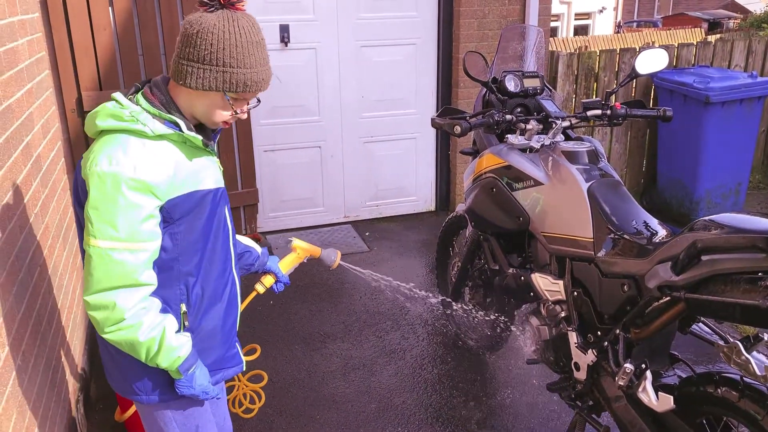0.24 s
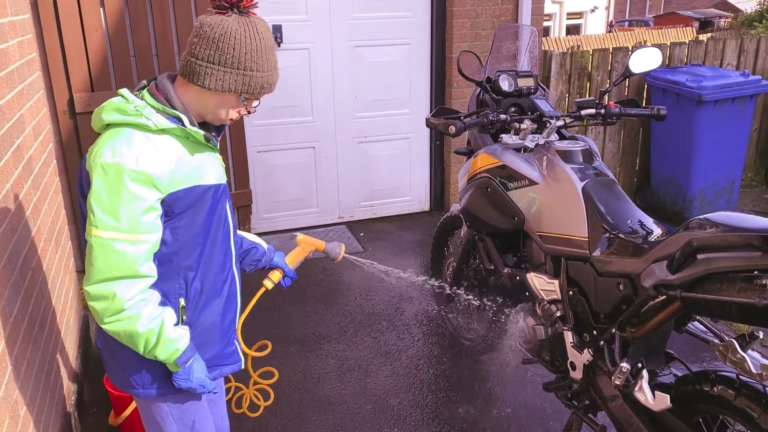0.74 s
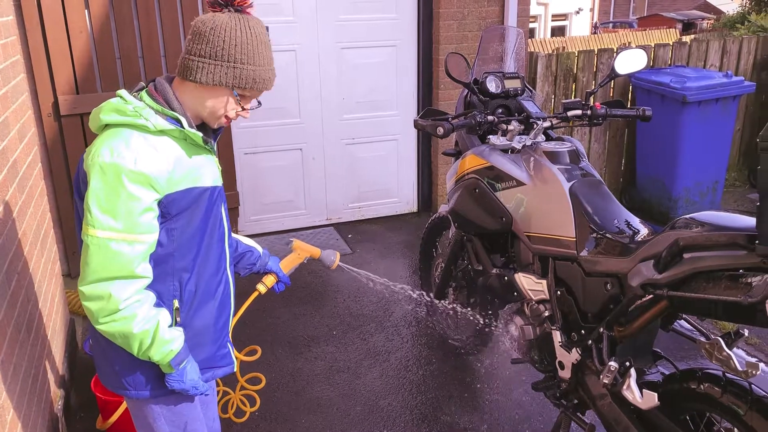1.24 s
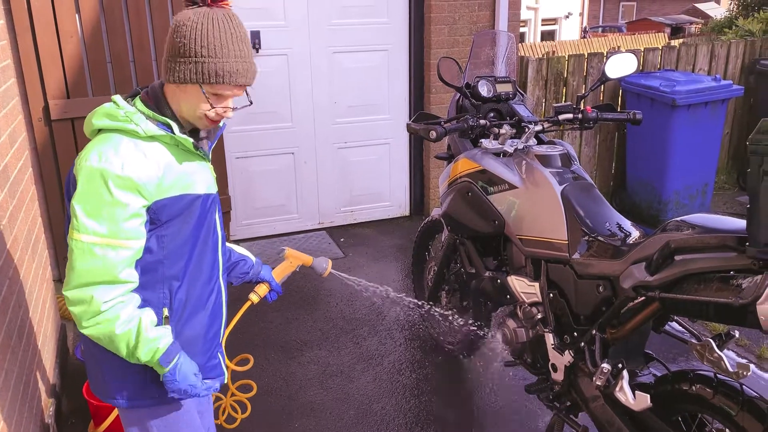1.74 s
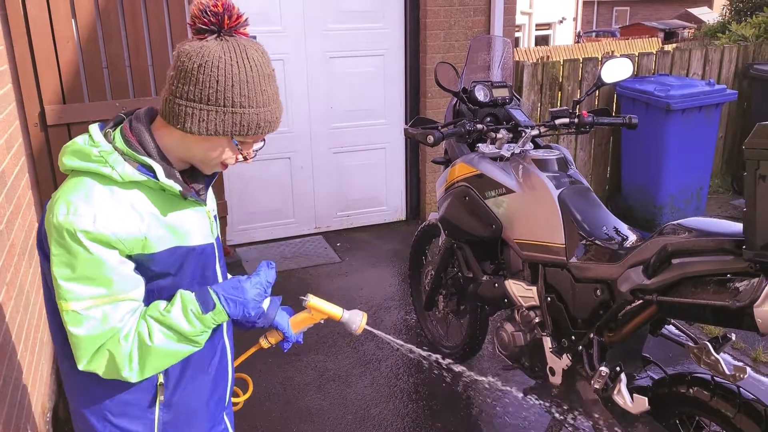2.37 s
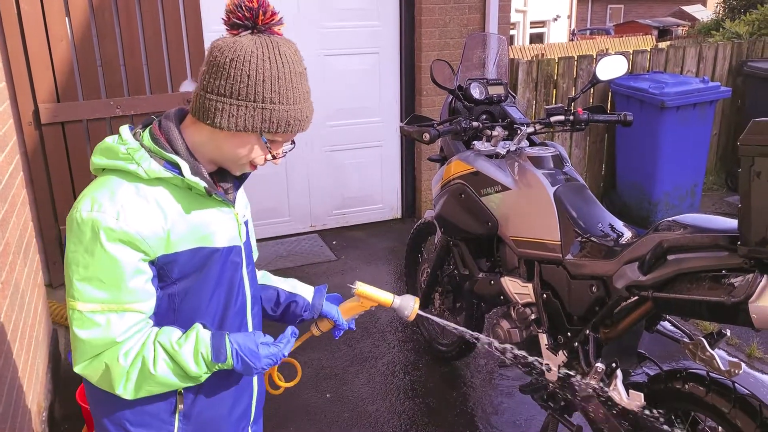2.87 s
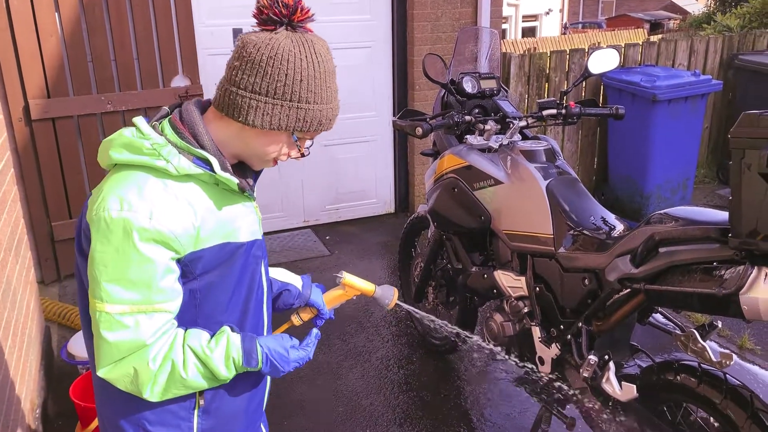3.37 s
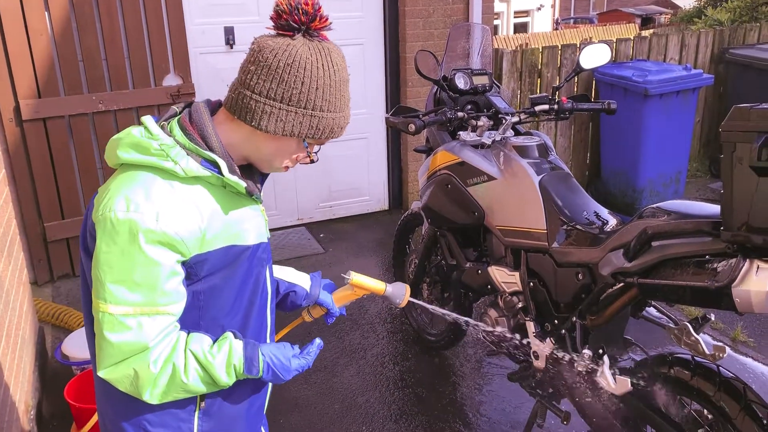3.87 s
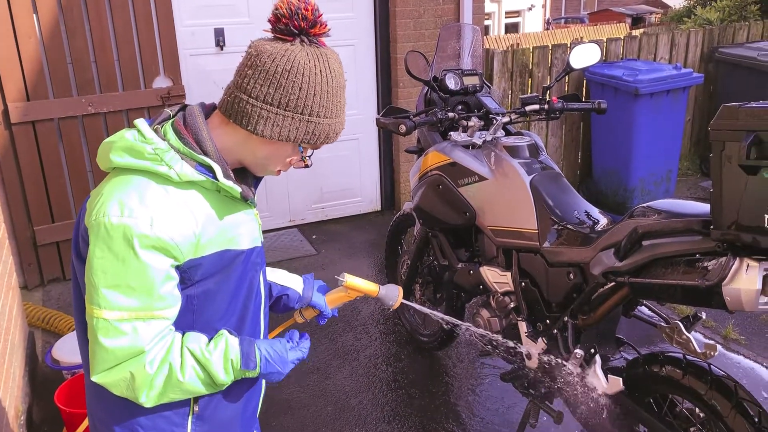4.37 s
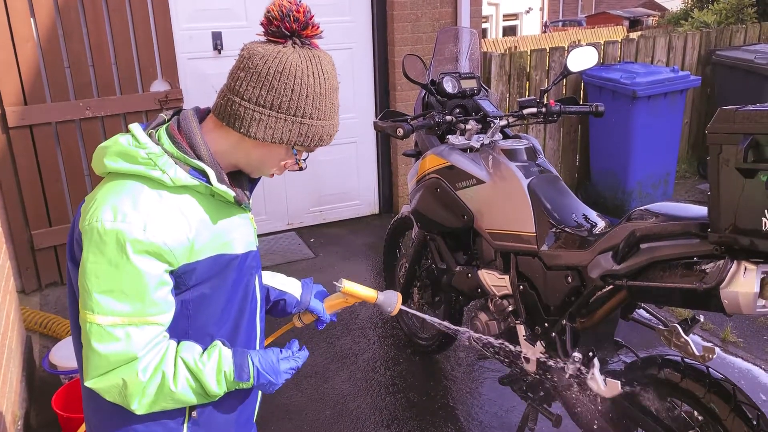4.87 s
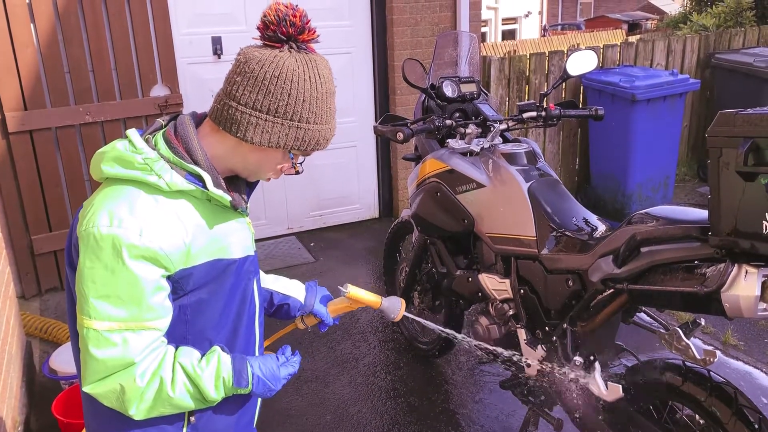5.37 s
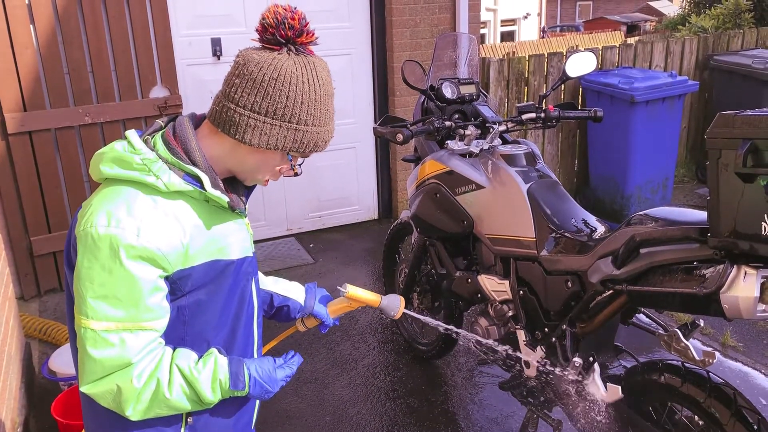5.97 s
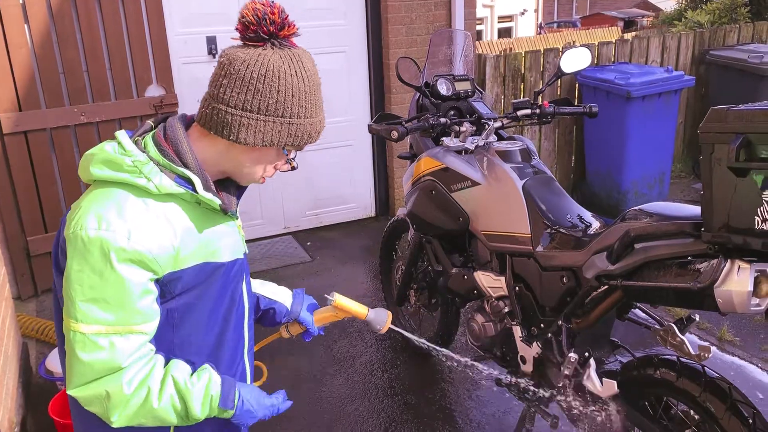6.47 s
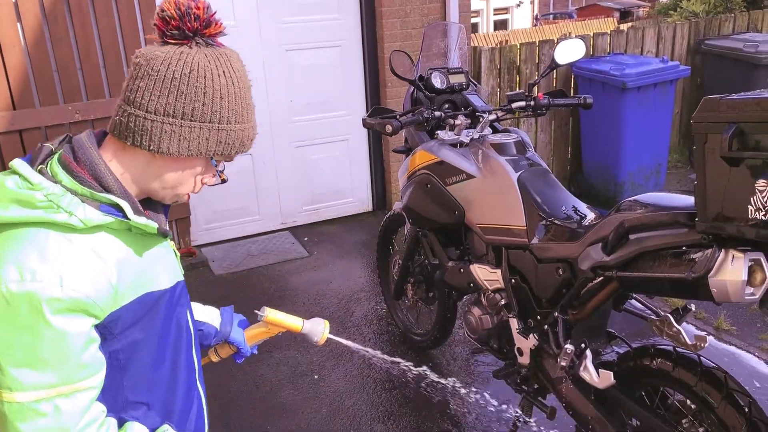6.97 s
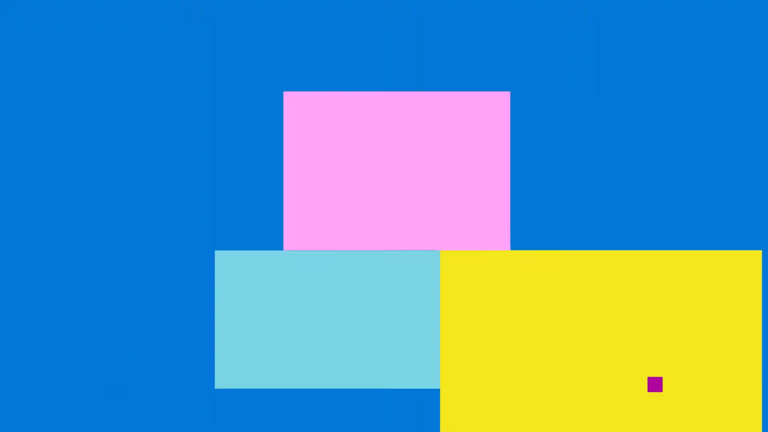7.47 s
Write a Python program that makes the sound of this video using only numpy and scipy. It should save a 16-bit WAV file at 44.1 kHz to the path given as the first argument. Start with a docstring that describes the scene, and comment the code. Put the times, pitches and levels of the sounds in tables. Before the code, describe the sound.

Crisp fizzing water spray in a paved yard, buffeting low wind, then lumpy splashes with hollow gurgles on a motorbike, cut off suddenly.

```python
"""Wind thumps and flutters on the microphones, strongest early on, over the fizz of a hose jet in a paved yard.
Filtered noise and spikes make the spray; big drops burst out of it and short rising tones trickle under it.
The jet sweeps over a motorbike: lumpy noise slaps, hollow parts resonate, trapped air plops as decaying sines.
A faint far rush lies below. All of it stops abruptly at the end."""
import sys
import numpy as np
from scipy import signal
from scipy.fft import rfft, irfft, next_fast_len
from scipy.io import wavfile
from scipy.ndimage import uniform_filter1d, map_coordinates

SR = 44100
rng = np.random.default_rng(int(sys.argv[2]) if len(sys.argv) > 2 else 0)


def persist_wave(psi):
    """Save psi, clipped to +-1, as 16-bit WAV."""
    counts = np.round(np.clip(psi, -1, 1) * 32767).astype(np.int16)
    wavfile.write(sys.argv[1], SR, np.atleast_2d(counts).T)


N = 340628

# Right port hears first: lag and phase turn for the spray, then for the jet on the bike.
SPRAY_LAG_S, SPRAY_TURN_RAD = 8.85 / SR, 1.33
BIKE_LAG_S, BIKE_TURN_RAD = .00027, 1.1


def amp(db):
    """Amplitude of a level in dB."""
    return 10 ** (np.asarray(db) / 20)


def unit(x):
    """x scaled to an RMS of 1."""
    return x / np.sqrt(np.mean(x ** 2) + 1e-20)


def along(points, hz):
    """Interpolates (Hz, value) points on a log frequency axis."""
    f, v = np.transpose(points)
    return np.interp(np.log(hz + 1), np.log(f + 1), v)


def curves(rows):
    """One value per sample for each column after the time."""
    s, *cols = np.transpose(rows)
    return [np.interp(np.arange(N) / SR, s, c) for c in cols]


def wobble(rate_hz):
    """A smooth random curve, rate_hz knots a second."""
    knots = rng.standard_normal(int(N * rate_hz / SR) + 4)
    return map_coordinates(knots, [np.arange(N) * rate_hz / SR])


def filtered(x, response):
    """x times a complex response of frequency."""
    m = next_fast_len(N + SR // 2)
    return irfft(rfft(x, m) * response(np.fft.rfftfreq(m, 1 / SR)), m)[..., :N]


def shaped(x, spectrum):
    """x coloured by (Hz, dB) points."""
    return filtered(x, lambda hz: amp(along(spectrum, hz)))


def patchy(depth_db, size=256):
    """Two white noises that share patches of random gain; a larger size makes them narrower and longer."""
    z = signal.stft(rng.standard_normal((2, N)), nperseg=size)[2]
    field = uniform_filter1d(rng.standard_normal(z.shape[1:]), size=6, axis=0)
    field = uniform_filter1d(field, size=8, axis=1)
    return unit(signal.istft(z * amp(depth_db * unit(field)), nperseg=size)[1][:, :N])


def bursts(sizes, t60_s):
    """Envelope of drops that start at once and decay exponentially."""
    return signal.lfilter([1], [1, -amp(-60 / (t60_s * SR))], sizes)


def patter(rate_hz, spread_db, t60_s):
    """Envelope of random drops: many small, a few large."""
    hit = rng.random(N) < rate_hz / SR
    size_db = spread_db * np.minimum(rng.exponential(size=N), 4)
    return unit(bursts(hit * amp(size_db), t60_s))


def pulses(starts, holds, rise_s, fall_s, sizes):
    """Events summed by size: each a smooth rise centred on its start, a hold and an exponential fall."""
    t = np.arange(0, N + 32, 32) / SR
    age = t - np.asarray(starts)[:, None]
    up = np.sin(np.pi / 2 * np.clip(age / rise_s + .5, 0, 1)) ** 2
    down = np.exp(-np.maximum(age - holds[:, None], 0) / fall_s)
    sums = np.atleast_2d(sizes) @ (up * down)
    return np.array([np.interp(np.arange(N) / SR, t, row) for row in sums])


def steady(x, share, seconds):
    """Takes part of the chance level swings out of a noise."""
    level = np.sqrt(np.abs(uniform_filter1d(x[0] ** 2, int(seconds * SR))) + 1e-12)
    return x / level ** share


def ports(pair, alike, lag_s, turn_rad):
    """Left and right from two noises: a shared part, lagged and turned in phase, and an own part."""
    # Each row: frequency in Hz, left minus right in dB.
    balance = [(400, .1), (900, 1.2), (1500, -2), (2700, -3), (3800, -.5), (5300, -4.5), (7000, .7),
               (8500, 0)]

    def mix(hz):
        c = np.clip(along(alike, hz), 0, 1)
        shared = c * np.exp(1j * (2 * np.pi * hz * lag_s - turn_rad))
        return np.array([shared, np.sqrt(1 - c * c)])

    both = np.array([pair[0], filtered(pair, mix).sum(axis=0)])
    return filtered(both, lambda hz: amp(along(balance, hz) * [[.5], [-.5]]))


def bubbles(count, hz, octaves, cycles, soft=1, size=1024):
    """Many short rising notes of trapped air, a few of them loud; each side has its own phase."""
    start, pitch = rng.random(count), rng.standard_normal(count)
    big, turn_rad = rng.exponential(size=count), rng.normal(1.31, 1.0, count)
    f = np.clip(hz * 2 ** (octaves * pitch), 500, 7000)[:, None]
    u = f * np.arange(size) / SR / cycles  # age in lifetimes
    shape = amp(4.8 * np.minimum(big, 3)[:, None]) * u ** soft * np.exp(-3 * u)
    phase = 2 * np.pi * cycles * (u + .06 * u * u)
    at = ((start * N).astype(int)[:, None] + np.arange(size)).ravel()
    sides = []
    for k in (0, 1):
        notes = shape * np.sin(phase + k * turn_rad[:, None])
        sides.append(np.bincount(at, notes.ravel(), N + size)[:N])
    return unit(np.array(sides))


def yard():
    """A faint steady rush from afar: band-shaped noise, alike at both ports in the lows."""
    # Far outdoor rush. Each row: frequency in Hz, relative density in dB per Hz.
    rush_spectrum = [(200, -31), (255, -20.5), (300, 8.5), (450, 6.5), (700, 0), (1500, -13)]
    far = ports(patchy(depth_db=4, size=512), [(300, .95), (800, 0.4)], 0, 0)
    return amp(-56.0) * unit(shaped(far, rush_spectrum))


def wind():
    """Eddies push on the microphones in lumps, almost alike; gusts top a breeze, rasping as they flutter harder."""
    # Breeze between gusts. Each row: time in seconds, buffet level in dB, dull and bright flutter in dB over it.
    breeze_rows = [(0.0, -40, -5, -4), (.25, -37.5, -22, -11.5), (0.74, -34, -21, -15),
                   (1.45, -39.5, -17.5, -21), (1.61, -37, -11, -34), (2.2, -42, -14.5, -20),
                   (2.6, -41, -18.5, -11), (3.14, -38, -17.5, -11), (3.34, -50, -25, -16),
                   (3.52, -43.5, -18, -12.5), (3.85, -40, -32, -35), (4.6, -45, -23, -23),
                   (5.42, -55.5, -26, -36), (5.56, -45.5, -11, -35), (5.9, -55.5, -14, -42),
                   (6.5, -55.5, -13.5, -32), (7.09, -54.5, -7.5, -23), (7.23, -67, -18, -12)]
    # Gusts. Each row: start in seconds, buffet level in dB, flutter in dB over it, hold in seconds.
    gust_rows = [(0.07, -46, -4, 0.016), (0.147, -32.5, -14, 0.015), (0.267, -20, -19, 0.01),
                 (0.314, -24.5, -9.5, 0.06), (0.396, -27.5, -7.5, 0.027), (0.459, -38, 2, 0.027),
                 (0.553, -39, -2, 0.042), (0.617, -30, -11, 0.019), (0.742, -31, -9.5, 0.017),
                 (0.773, -29, -21, .03), (0.824, -27, -17, 0.021), (0.92, -38, -31, 0.017),
                 (1, -36.5, -7, 0.027), (1.045, -25.5, -17, 0.016), (1.096, -36, -12, 0.06),
                 (1.189, -38.5, -5.5, 0.028), (1.38, -30, -11, 0.048), (1.481, -32, -28, .025),
                 (1.526, -23, -20, 0.016), (1.55, -33.5, -6.5, 0.021), (1.679, -26, -9, 0.026),
                 (1.746, -31.5, -13, 0.023), (1.804, -25, -6.5, 0.013), (1.952, -38, -22, 0.035),
                 (2.196, -40, -13, 0.022), (2.485, -49.5, 1, 0.042), (2.548, -42, -22, 0.032),
                 (2.64, -41, -34, 0.02), (2.717, -53.5, 12, 0.034), (2.948, -30, -15, 0.055),
                 (3.098, -40, -33, 0.04), (3.179, -41, -0.5, 0.036), (3.301, -38, -23, 0.024),
                 (3.736, -42, -4, 0.038), (3.8, -38.5, -22, 0.033), (3.895, -42, -39, 0.025),
                 (4.048, -44, -20, 0.025), (4.49, -46, -37, 0.027), (4.833, -47, -16, 0.045),
                 (4.928, -45, -18, 0.031), (5.01, -44, -14.5, 0.1), (5.39, -42.5, -28, 0.045),
                 (5.52, -46, -34, 0.054), (5.67, -54, -31, 0.04), (5.838, -44.5, -22, 0.023),
                 (6.127, -48, -16, 0.038), (6.577, -47.5, -21, 0.059), (6.745, -57, 7.5, 0.025),
                 (7.121, -45.5, -29, 0.021), (7.195, -49, -11, 0.017), (7.237, -41, 8, 0.022)]
    # Wind spectra, from dull to bright. Each row: frequency in Hz, relative density in dB per Hz.
    buffet_spectrum = [(15, -44.5), (30, -11.5), (50, 4), (70, 3), (110, -4.5), (170, -14), (300, -57)]
    ruffle_spectrum = [(90, -15.5), (140, -7), (185, -5), (225, -13), (400, -31)]
    flutter_spectrum = [(90, -37.5), (170, -3), (260, -1), (450, -18), (650, -40), (1000, -55.5),
                        (2000, -81)]
    rasp_spectrum = [(300, -37), (450, 3), (700, -7), (900, -23.5), (1500, -55.5)]
    near_alike = [(30, .98), (60, .996), (125, .992), (250, .98), (500, .93)]  # Hz, left-right likeness
    rasp_db, rasp_db_per_db = -57.5, 1.2  # at a flutter of -40 dB; growth with flutter

    breeze_db, dull_db, bright_db = curves(breeze_rows)
    s, gust_db, gust_flutter_db, hold = np.transpose(gust_rows)
    gust_sizes = amp([gust_db, gust_db + gust_flutter_db])
    shove, shake = pulses(s, hold, rise_s=0.016, fall_s=0.016, sizes=gust_sizes)
    strong = amp(breeze_db + 2.5 * wobble(14)) + shove
    quick = amp(breeze_db + bright_db + 2.5 * wobble(14)) + shake

    push = ports(rng.standard_normal((2, N)), near_alike, 0, 0)
    buffet = unit(steady(shaped(push, buffet_spectrum), share=0.79, seconds=0.044))
    flutter = steady(shaped(push, flutter_spectrum), share=0.29, seconds=0.017)
    flutter = unit(amp(2.3 * wobble(45)) * flutter)
    ruffle = amp(breeze_db + dull_db + 4.5 * wobble(14)) * unit(shaped(push, ruffle_spectrum))
    rasp_gain = amp(rasp_db + 7 * wobble(40)) * (quick / amp(-40)) ** rasp_db_per_db
    rasp = rasp_gain * unit(shaped(push, rasp_spectrum))
    return strong * buffet + quick * flutter + ruffle + rasp


def plops():
    """Slugs of water hit pockets: trapped air rings briefly, its pitch rising a little as the pocket shrinks."""
    # Plops, plus two faint early tones (the first two rows) that sound with the gusts near 1.2 s. Each row:
    # start in seconds, starting pitch in Hz, level in dB before onset and churn, t60 in seconds.
    plop_rows = [(1.19, 726, -33, 0.068), (1.27, 755, -34.5, 0.067), (2.02, 730, -28, 0.2),
                 (2.05, 832, -27, 0.065), (2.109, 1940, -23, 0.026), (2.21, 905, -24, 0.054),
                 (2.224, 1228, -24, 0.095), (2.235, 625, -30.5, 0.18), (2.233, 1670, -23.5, 0.13),
                 (2.313, 1130, -27, 0.027), (2.312, 628, -32, 0.12), (2.347, 640, -36, .05),
                 (2.349, 1250, -29, .03), (2.392, 994, -34, .05), (4.07, 1610, -29.5, .06),
                 (4.16, 1000, -36, .08), (2.75, 1720, -25, 0.031), (3.273, 1540, -25, 0.04),
                 (3.286, 1700, -26, .03), (3.297, 1060, -31, .03), (3.316, 1260, -29, .07),
                 (3.325, 596, -23.5, 0.15), (3.53, 2100, -38.5, .08), (3.535, 1044, -28.5, 0.09),
                 (3.545, 605, -32, 0.16), (3.58, 1015, -19, 0.041), (3.61, 1200, -16, 0.02),
                 (3.623, 1170, -20.5, 0.02), (3.638, 1240, -23, .015), (3.655, 3100, -26, .02),
                 (3.675, 3050, -24, 0.028), (3.718, 1240, -29, .06), (3.49, 1630, -30.5, .03),
                 (5.08, 2060, -32, 0.063), (5.524, 1004, -24, 0.11), (5.59, 990, -33, .04),
                 (5.537, 1700, -28, .07), (5.763, 3300, -16.5, 0.011), (6.483, 1050, -37, .03),
                 (6.53, 638, -31, 0.07), (6.757, 2930, -30, .03), (6.86, 2140, -15.5, 0.0082),
                 (6.862, 3370, -19, 0.012), (6.861, 2670, -21, 0.01)]
    out, t = np.zeros((2, N + SR)), np.arange(SR // 5) / SR
    for s, hz, db, t60 in plop_rows:
        right_turn = np.clip(2 * np.pi * hz * BIKE_LAG_S - BIKE_TURN_RAD, 0, 1.7)
        phase = 2 * np.pi * hz * (t + 0.59 * t * t) + rng.uniform(0, 7.5)
        tone = np.sin(phase + np.array([[0], [right_turn]]))
        # spray keeps disturbing the pocket
        churn = amp(2.5 * np.interp(t, np.linspace(0, .2, num=40), rng.standard_normal(size=40)))
        envelope = amp(db - 60 * t / t60) * (1 - np.exp(-t / (0.12 * t60)))
        out[:, round(s * SR):][:, :len(t)] += churn * envelope * tone
    return out[:, :N]


def splash():
    """The jet slaps the bike in lumps; the harder it hits, the more the panels ring."""
    # Jet on the bike. Each row: time in seconds, drive level in dB.
    flow_rows = [(0, -53), (1.4, -48.5), (1.8, -59), (2.05, -43.5), (2.45, -44.5), (2.68, -49), (2.84, -48),
                 (3, -41), (3.5, -44.5), (4, -43.5), (4.3, -40.5), (4.62, -45), (4.93, -47.5), (5.1, -40),
                 (5.28, -43), (5.43, -40.5), (5.475, -44), (5.62, -43.5), (5.75, -48.5), (6.1, -43.5),
                 (6.4, -43), (6.65, -56), (7.23, -48)]
    # The jet meets a panel. Each row: start in seconds, drive level in dB, hiss in dB over it, hold in seconds.
    slap_rows = [(1.998, -39.5, -4.5, 0.035), (2.199, -35, -12, 0.018), (2.228, -34, 1, 0.018),
                 (2.262, -45, -0.5, 0.026), (2.304, -39.5, -4, 0.027), (2.346, -40.5, -9, 0.011),
                 (2.39, -44, -1, 0.018), (2.482, -47.5, 1, 0.043), (2.711, -46, 3, 0.049),
                 (2.862, -44.5, -6, 0.059), (3.098, -49.5, 9, 0.078), (3.252, -44, -5, .015),
                 (3.272, -38.5, -2, 0.03), (3.311, -38, -7, 0.027), (3.53, -29, -4.5, 0.054),
                 (3.582, -34, -8.5, 0.016), (3.614, -40, 1.5, 0.043), (3.712, -51, 2, 0.12),
                 (4.05, -44, -10, 0.035), (4.153, -45.5, -7, 0.026), (4.75, -49.5, -2, 0.058),
                 (5.059, -42, 3.5, 0.03), (5.506, -40, -12, 0.02), (5.521, -34.5, -13, 0.025),
                 (5.56, -47, -2, 0.031), (6.475, -47.5, 3, .02), (6.513, -43.5, 0.5, 0.025),
                 (6.561, -46, 2.5, .04), (6.755, -55, 6, 0.039), (6.86, -57.5, 17, 0.024)]
    # Spatter. Each row: frequency in Hz, relative density in dB per Hz.
    spatter_spectrum = [(500, -46), (900, -15), (1200, -1), (1700, -1.5), (2600, -1.5), (3300, -1),
                        (3800, -9.5), (7000, -23.5)]
    # Panels and cavities of the bike. Each row: resonance in Hz, width in Hz, relative gain in dB.
    hollow_modes = [(595, 56, 1.5), (755, 39, 5.5), (997, 51, 7), (1190, 210, 0), (1690, 197, 2.5),
                    (2070, 290, -2), (3040, 420, -1)]
    alike = [(600, 0.8), (1000, 0.43), (3000, 0.2)]  # Hz, left-right likeness

    s, db, hiss_db, hold = np.transpose(slap_rows)
    flow = amp(curves(flow_rows)[0] + 1.8 * wobble(14))
    hits = pulses(s, hold, rise_s=0.0079, fall_s=0.016, sizes=amp([db, db + hiss_db]))
    splash_db, spatter_db = 20 * np.log10(flow + hits)

    lumps = unit(3 + patter(rate_hz=240, spread_db=3, t60_s=0.02))
    slap = ports(lumps * patchy(depth_db=4.0, size=1024), alike, BIKE_LAG_S, BIKE_TURN_RAD)
    slap = unit(shaped(slap, spatter_spectrum))
    gurgle = bubbles(count=5000, hz=1531, octaves=.7, cycles=13.0)

    def ring(f):
        total = 0
        for k, (centre, width, gain_db) in enumerate(hollow_modes):
            damping = 1j * f * width
            total = total + (-1) ** k * amp(gain_db) * damping / (centre * centre - f * f + damping)
        return total

    # single lumps of water drum on the panels
    taps = unit(2 + 0.45 * patter(rate_hz=120, spread_db=4, t60_s=0.02))
    drumming = ports(taps * patchy(depth_db=2.0), alike, BIKE_LAG_S, BIKE_TURN_RAD)
    boom = unit(filtered(drumming, ring))

    slap_gain = amp(0.78 * (spatter_db + 47.0) - 49.0)
    boom_gain = amp(1.06 * (splash_db + 45.0) - 52.5)
    return slap_gain * slap + boom_gain * boom + amp(splash_db - 11.5) * gurgle


def spray():
    """Fizz of fine drops, sharp single drops on it, and the largest drops one by one; run-off trickles under it."""
    # Spray. Each row: time in seconds, relative fizz level in dB, lift of the lower and upper bright band in dB.
    spray_rows = [(0, -34.5, -0.5, -0.5), (.38, -33, 4.5, 1.5), (.5, -35, 1.5, 3.5), (.95, -34.5, 2, -0.5),
                  (1.1, -33.5, 6.5, 2), (1.35, -33.5, 2.5, 2), (2, -35, 2, 0), (2.4, -32.5, -0.5, 2),
                  (2.62, -34, -3, 7), (2.9, -37, -1.5, 3.5), (3.25, -33.5, -0.5, 1.5), (3.9, -36, 0.5, 3),
                  (4.1, -34, -2.5, 3), (4.35, -36, 6, 1), (4.52, -32, 1, 2.5), (4.7, -35.5, -1, 3),
                  (4.82, -34, 0.5, 0), (5, -33, -2, 3.5), (5.25, -35, 1.5, 0), (5.7, -33.5, 0, 1),
                  (6, -31.5, -3, 2), (6.2, -31.5, 2.5, -1), (6.45, -36, 0, 1.5), (6.82, -36, 1.5, 5.5),
                  (7.23, -34.5, -1, 2.5)]
    # Brief dips and surges of the fizz. Each row: start in seconds, change in dB, hold in seconds.
    sputter_rows = [(0.025, -2.5, 0.025), (0.67, 3, 0.058), (1.68, -4, .06), (2.164, -3.5, 0.043),
                    (2.662, -6.5, 0.024), (2.994, -2.5, .05), (3.33, -2, 0.026), (3.563, 4.5, 0.036),
                    (3.658, 2, 0.018), (3.698, -1.5, 0.059), (3.86, -3.5, 0.018), (4.165, 3, 0.051),
                    (4.56, -3.5, 0.03), (4.6, -3, 0.066), (4.752, 2, 0.055), (4.87, -4, 0.039),
                    (5.01, 1.5, 0.11), (6.467, 3, 0.02), (6.502, -2.5, .04), (6.57, 2.5, 0.038),
                    (6.648, -2.5, 0.052), (6.705, 4, 0.053)]
    # Big drops bursting. Each row: time in seconds, relative level in dB.
    drop_rows = [(0.0667, -11), (0.2319, -15), (0.3262, -17), (0.3701, -16), (0.3975, -17), (0.5716, -18),
                 (1.0715, -17), (1.3294, -19), (1.585, -17), (1.774, -18), (2.2752, -16), (2.3825, -17),
                 (2.5701, -9.5), (2.6135, -17), (3.2066, -14), (3.7783, -18), (4.1594, -16), (4.5741, -10),
                 (4.616, -17), (6.5924, -9), (6.7136, -15), (6.9721, -17), (7.1771, -16), (7.223, -20)]
    # Fizz. Each row: frequency in Hz, relative density in dB per Hz.
    fizz_spectrum = [(700, -36.5), (1500, -19.5), (2600, -12.5), (3620, -11.5), (3850, -5), (4700, -4.5),
                     (5500, -2.5), (6500, -0.5), (7400, -1), (10000, 1), (13000, 0), (16000, 1)]
    # Left-right likeness set for the fizz: low below 7 kHz, high but uneven above.
    # Each row: frequency in Hz, likeness from 0 to 1.
    likeness_rows = [(1000, 0.1), (3000, 0.092), (4500, 0.092), (6000, 0.09), (7400, 0.28), (8500, 1),
                     (9700, .7), (11000, 1), (12300, 0.52), (13500, .93), (14600, .66), (15800, .9)]
    # Bands that come and go as the jet moves. Each row: centre in Hz, half-width in Hz.
    bright_bands = [(4400, 820), (6200, 830)]
    lesser_rate_hz, lesser_db = 4, -24  # lesser big drops at random
    drop_low_hz = 4200  # big drops have little sound below this

    s, change_db, hold = np.transpose(sputter_rows)
    level_db, *lift_db = curves(spray_rows)
    sputter_db = pulses(s, hold, rise_s=0.021, fall_s=0.016, sizes=change_db)[0]
    fizz_db = level_db + sputter_db + 0.32 * wobble(10)
    grain = unit(1.5 + 0.41 * patter(rate_hz=260, spread_db=3.0, t60_s=0.02))
    swell = amp(fizz_db + 0.92 * wobble(25) + 0.29 * wobble(70) + 6.5)

    big = (rng.random(N) < lesser_rate_hz / SR) * amp(lesser_db + 1.3 * rng.standard_normal(N))
    s, db = np.transpose(drop_rows)
    big[(s * SR).astype(int)] = amp(db)
    noise, thin = patchy(depth_db=1.5), signal.butter(2, drop_low_hz, 'high', fs=SR)
    big_noise = amp(-5) * bursts(big, t60_s=0.005) * noise
    white = swell * grain * noise + signal.lfilter(*thin, big_noise)

    # each drop is a spike; the largest are answered by the paving about two milliseconds later
    small = (rng.random(N) < 300 / SR) * amp(1.7 * np.minimum(rng.exponential(size=N), 3))
    small = small * np.sign(rng.standard_normal(N))
    crack = amp(10.5) * (np.roll(big, round(.0008 * SR)) - .9 * np.roll(big, round(.0027 * SR)))
    spikes = 0.42 * swell * unit(small) + signal.lfilter(*thin, crack)
    scatter = rng.standard_normal(64) * amp(-np.arange(64) * 0.34)
    scattered = signal.fftconvolve(spikes, scatter / np.linalg.norm(scatter))[:N]
    white += [spikes, scattered]

    sides = ports(white, likeness_rows, SPRAY_LAG_S, SPRAY_TURN_RAD)
    reference_db = along(fizz_spectrum, 10000.)
    fizz = amp(0.5) * filtered(sides, lambda hz: amp(along(fizz_spectrum, hz) - reference_db))
    lifted = 0
    for band_db, (centre, width) in zip(lift_db, bright_bands):
        band = filtered(fizz, lambda hz: np.exp(-((hz - centre) / width) ** 2))
        lifted = lifted + (amp(band_db) - 1) * band

    trickle = amp(level_db - 21.0) * bubbles(count=2000, hz=2803, octaves=.45, cycles=25)
    # droplets landing close by
    ticks = amp(fizz_db - 22.5) * bubbles(count=5000, hz=3450, octaves=.6, cycles=15, soft=0.44, size=320)
    return trickle + ticks + fizz + lifted


def scene():
    """All layers at their own levels."""
    return yard() + wind() + plops() + splash() + spray()


def record(dry):
    """Cuts the sound with a very short fade and keeps nothing above the band limit."""
    end_s, top_hz = 7.237, 15870
    fade = amp(-np.clip(np.arange(N) / SR - end_s, 0, .2) * 1900)  # 1900 dB per second
    edge = lambda hz: np.sin(np.pi / 2 * np.clip((top_hz - hz) / 200, 0, 1)) ** 2
    return filtered(dry * fade, edge)


dry = scene()
out = record(dry)
persist_wave(out)
```